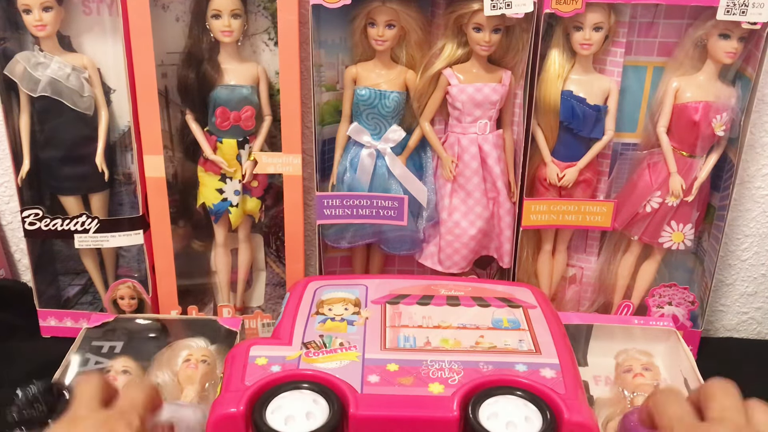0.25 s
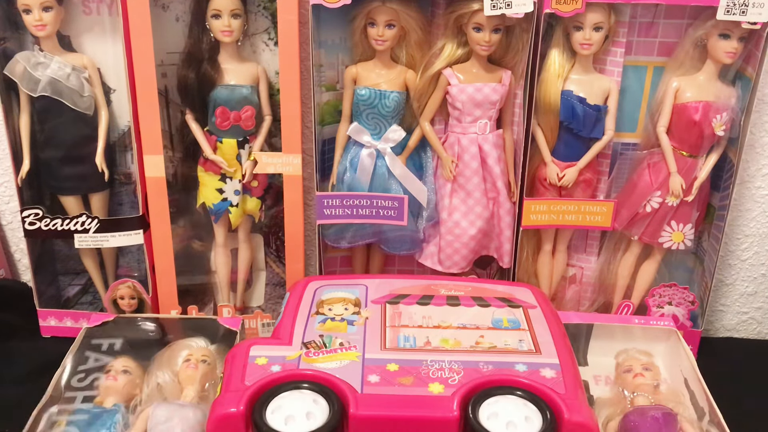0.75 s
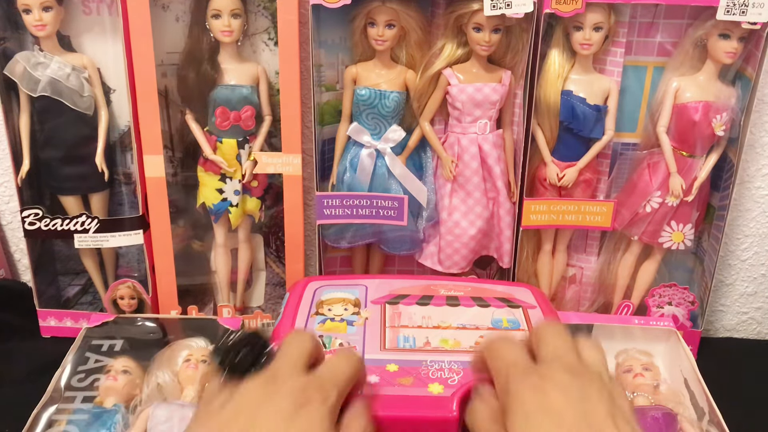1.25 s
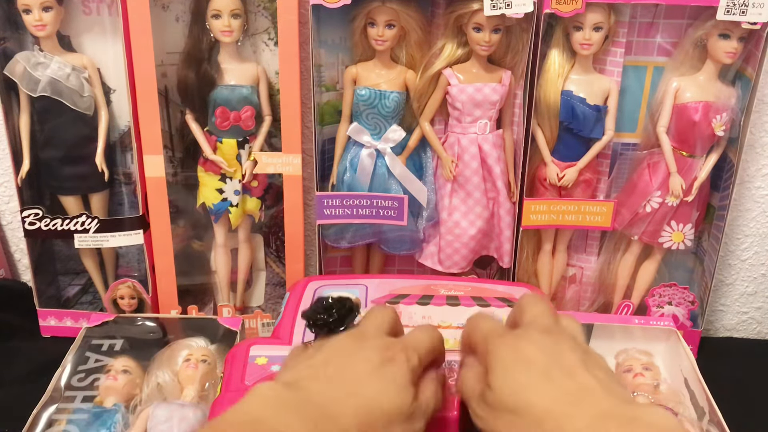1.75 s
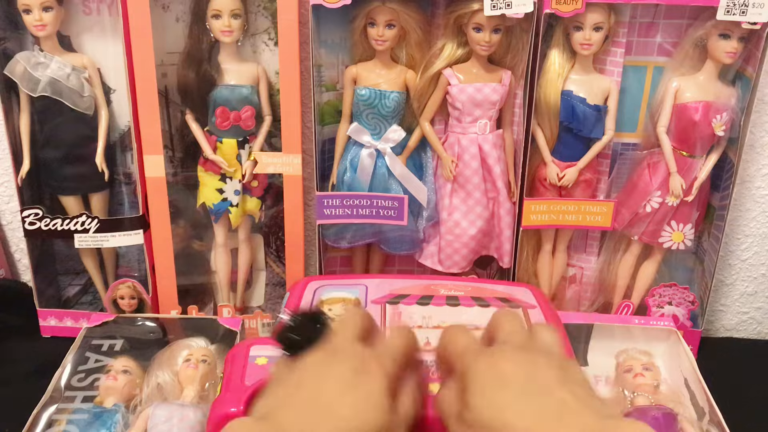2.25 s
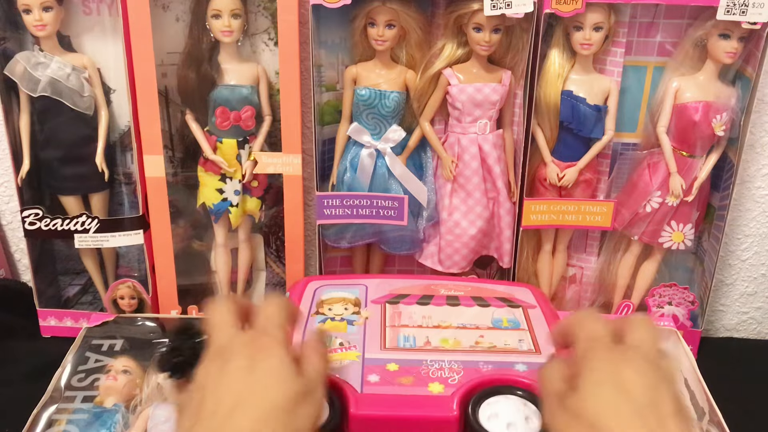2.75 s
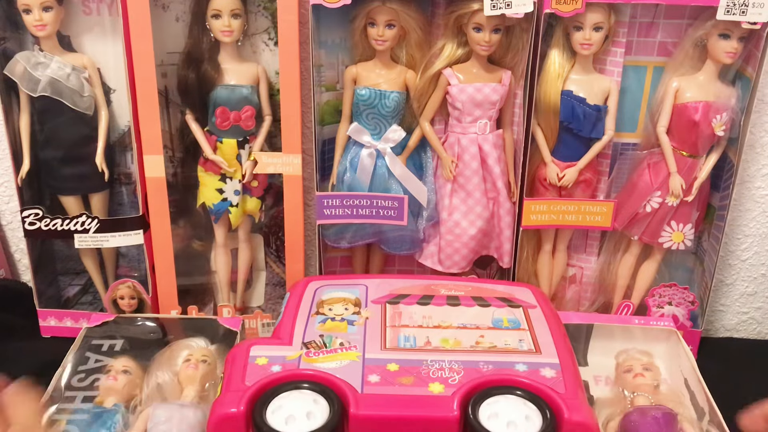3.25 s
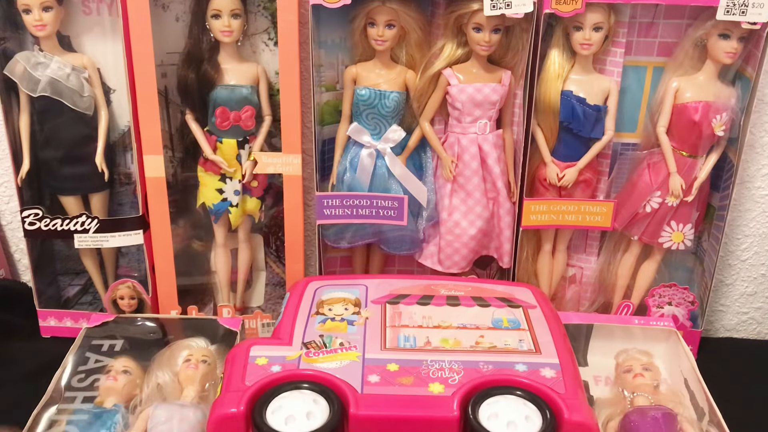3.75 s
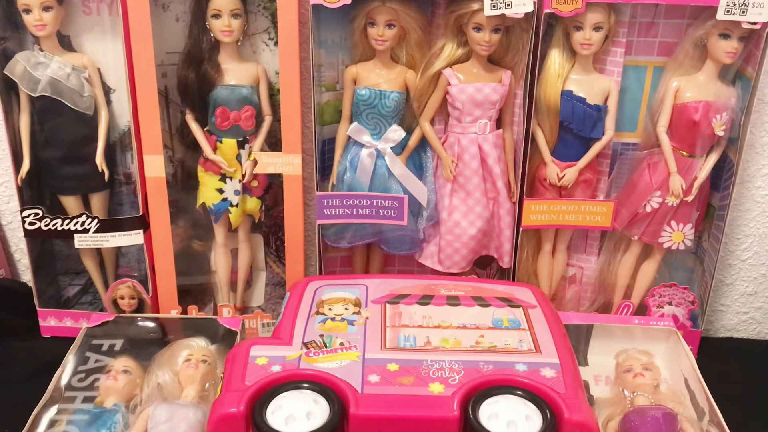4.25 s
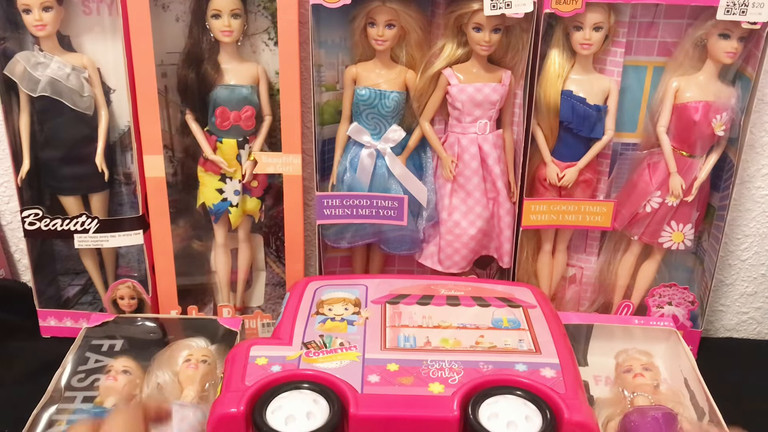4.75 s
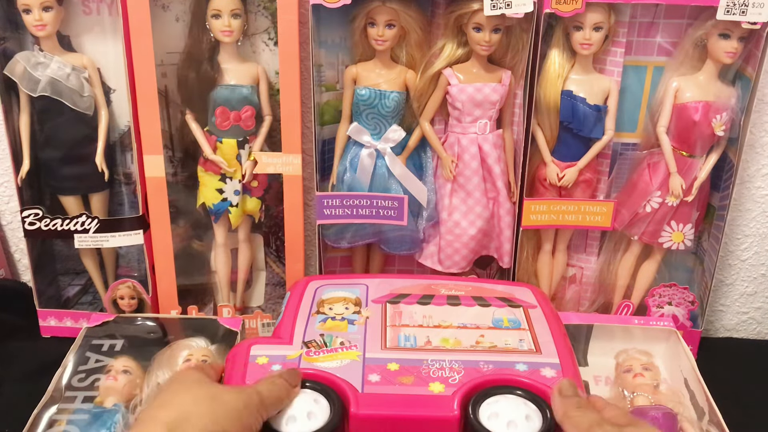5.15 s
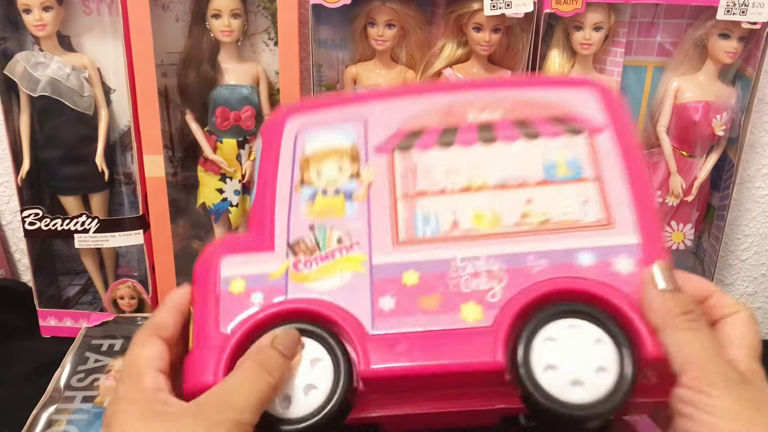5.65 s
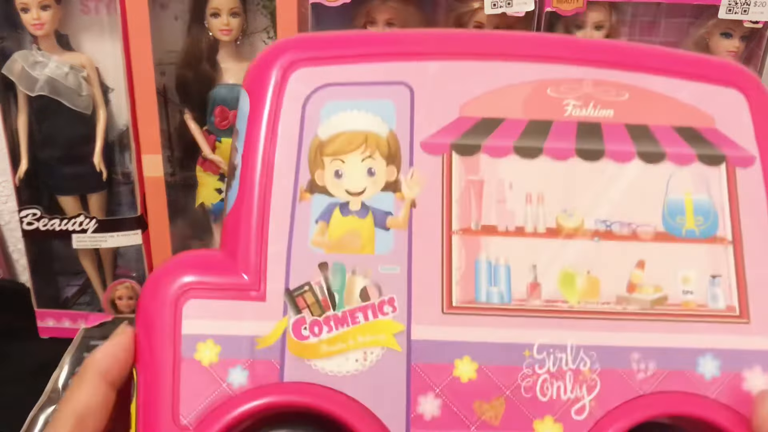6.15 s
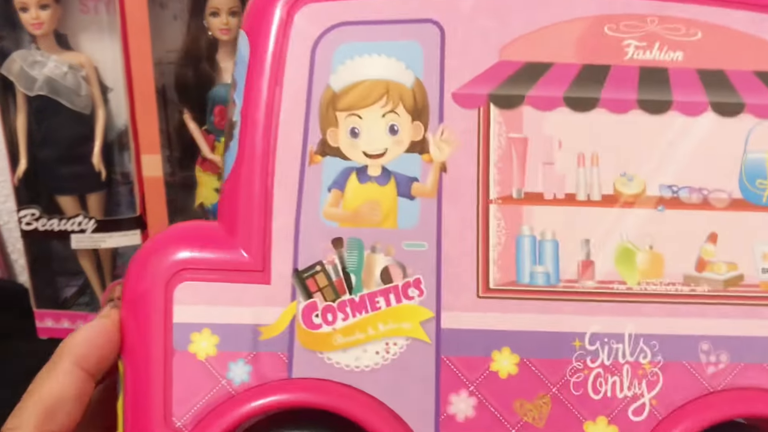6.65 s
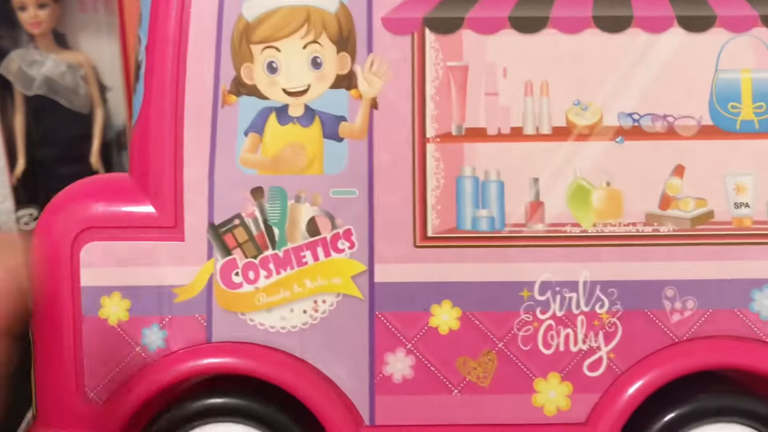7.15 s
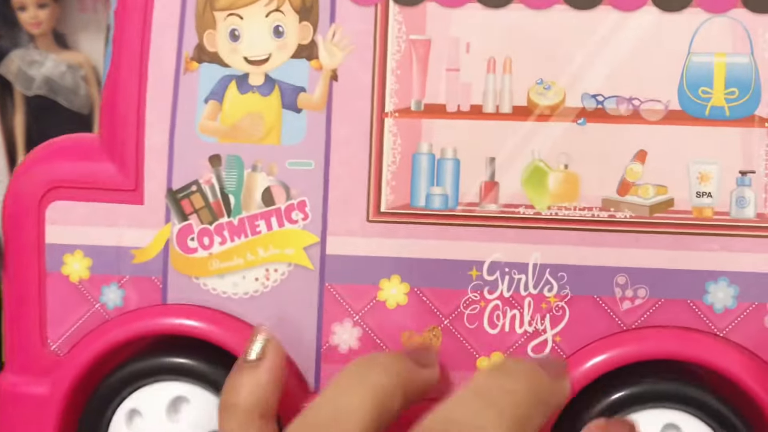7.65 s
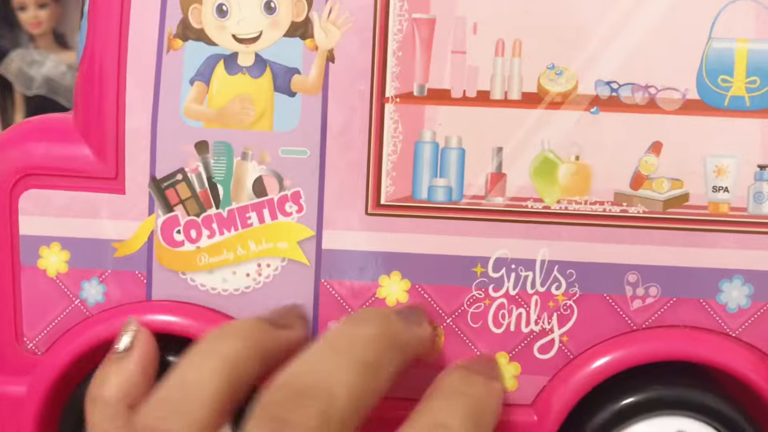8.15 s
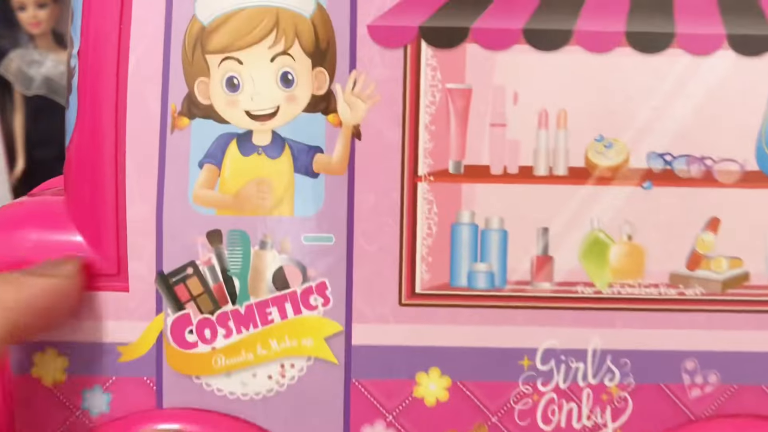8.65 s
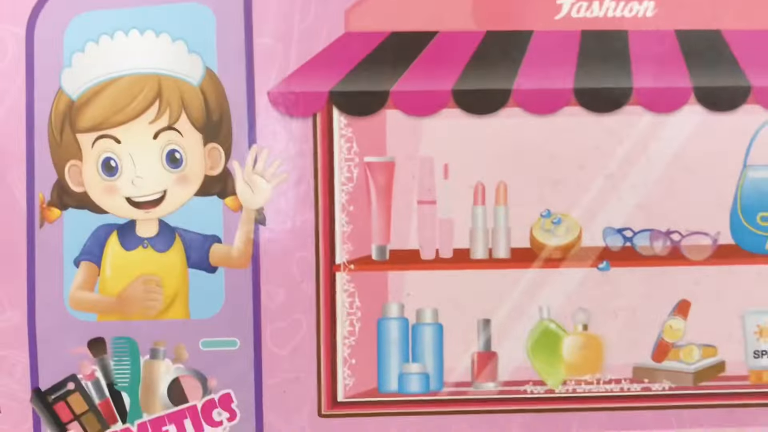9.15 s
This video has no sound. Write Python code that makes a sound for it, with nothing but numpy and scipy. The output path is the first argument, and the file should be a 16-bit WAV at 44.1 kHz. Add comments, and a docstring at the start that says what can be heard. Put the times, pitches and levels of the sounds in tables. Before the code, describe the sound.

A small, quiet room with a short tail and a very faint low rumble. From 0 to 0.9 s, both hands' fingernails drum on a thin plastic-lidded box about every 0.2 s, each tap a slightly split double clack with a light tick, springy lid rebound and soft low boom. From 1.2 to 3.1 s, the same steady rhythm moves to a hollow plastic toy van, knockier and rounder, with loose chatter. Sharper box taps return from 3.4 to 4.7 s, with small gaps. At about 4.95 s fingers grip the van; until 6.4 s it creaks, bumps, clicks and rattles as it rises close to the microphone, with a brief fingertip drag. From 7.4 to 8.3 s, close, dry, paired finger taps, the first two strongest, then softer. Afterwards tiny clicks and uneven, whispery fingertip rubbing fade to near silence after 9 s.

```python
"""In a small quiet room, fingernails drum on a box and on the hollow plastic toy van resting on it.
The van is then picked up, creaking and rattling, and held close, where it is tapped again and stroked.
Each contact is made of short noise bursts shaped into a low knock, a clack of the wall and a tick of the nail.
Rubbing skin is made of tiny uneven jerks plus a hiss; the room adds a short tail and a faint steady rumble."""
import sys
import numpy as np
from scipy import signal
from scipy.fft import rfft, irfft
from scipy.io import wavfile

SR = 44100
rng = np.random.default_rng(int(sys.argv[2]) if len(sys.argv) > 2 else 0)


def master(y):
    """Save y as 16-bit WAV."""
    cut = np.clip(np.atleast_2d(y).T, -1, 1)
    pcm = np.round(cut * 32767)  # scale
    wavfile.write(sys.argv[1], SR, pcm.astype(np.int16))


N = 414540
TIME = np.arange(N) / SR  # seconds
HIT_SIZE = 8192  # samples in one contact
TOP_HZ = 16100  # the recorder passes nothing much above this

# Colour of the quiet room's background. Each row: frequency in Hz, relative gain in dB.
AIR = [(15, -33), (25, -6.5), (53, -0.5), (74, -4.5), (108, -6.5), (229, -10), (326, -5.5), (363, -12.5),
       (439, -15.5), (754, -25), (1130, -22), (2220, -26.5), (16000, -40)]
AIR_DB = -65  # overall level of that background

# Colour of the box and its plastic lid. Each row: frequency in Hz, relative gain in dB.
BOX_COLOUR = [(60, -8), (96, -7.5), (130, -3.5), (172, -7), (280, -2), (340, -4.5), (520, 1.5), (730, -2),
              (950, -5.5), (1700, -5.5), (2150, -7.5), (2650, -12), (3900, -12.5), (5000, -19),
              (6500, -20.5), (8200, -28), (10400, -30.5), (12400, -30), (16000, -32)]
# Colour of the van standing on the box. Each row: frequency in Hz, relative gain in dB.
RESTING_COLOUR = [(60, -6.5), (96, -11), (130, -4), (170, -7.5), (260, -1.5), (380, -2), (520, -2.5),
                  (990, -11), (1600, -10.5), (2700, -14.5), (4000, -15), (6500, -21.5), (8200, -26.5),
                  (10400, -30.5), (12400, -28.5), (16000, -32.5)]
# Colour of the van in the hands. Each row: frequency in Hz, relative gain in dB.
HELD_COLOUR = [(60, -10), (130, -5.5), (260, -4.5), (500, -6.5), (760, -11.5), (1600, -8.5), (2400, -17),
               (5000, -16.5), (6800, -20), (8300, -27), (10400, -33), (12400, -26.5), (16000, -34.5)]
# Colour of the creak under a grip. Each row: frequency in Hz, relative gain in dB.
GRIP_COLOUR = [(100, -4.5), (350, 3), (520, 5.5), (760, -8), (1020, -3), (1700, -3), (2500, -10),
               (3600, -13), (5000, -20), (12000, -30)]
# Colour of the creak under a dragging fingertip. Each row: frequency in Hz, relative gain in dB.
DRAG_COLOUR = [(250, 6), (360, 17), (600, -19), (1020, 1), (1600, -24), (3000, -8.5), (6000, -41)]
# Colour of the creak under a stroke. Each row: frequency in Hz, relative gain in dB.
STROKE_COLOUR = [(130, 7), (350, 2), (1050, 4), (1800, -3), (3300, -12), (12000, -28)]
# Colour of the hiss of gliding skin. Each row: frequency in Hz, relative gain in dB.
SKIN_COLOUR = [(1000, -15), (3500, -1), (6300, 8), (8000, 1), (11000, 3), (14000, 7), (16000, -7.5)]

# In the contact tables, levels are in dB before each sound's own trim.
# Both hands drum on the box beside the van, one just after the other.
# Each row: start in seconds, first hand in dB, lag of the second hand in seconds, second hand in dB,
# knock against clack in dB, tick against clack in dB, ring of the first spot in Hz, boom in dB,
# how many seconds the nail grazes ahead of the first landing.
BOX_TAPS = [(.003, -20.5, 0.022, -22.5, -3.5, -13, 900, -52, 0.0024),
            (0.19, -25, 0.025, -23, -1.5, -13.5, 780, -51, 0.0063),
            (.39, -23.5, 0.023, -19, -3, -10.5, 760, -52.5, 0.011),
            (.595, -21.5, 0.024, -23.5, -5.5, -12, 750, -59, 0.0055),
            (0.787, -19, 0.0072, -20.5, -2.5, -7.5, 1450, -48.5, 0.0049),
            (3.402, -24.5, 0.015, -27, -1, -8.5, 696, -42, 0.0038),
            (3.62, -22.5, .018, -21, -3.5, -7.5, 2020, -52, 0.0054),
            (3.794, -20, 0.011, -16.5, -4, -7, 1640, -46.5, 0.0048),
            (4.217, -17.5, 0.025, -28.5, -5, -8, 1730, -43, 0.0044),
            (4.398, -20, 0.0055, -29.5, -6, -9, 2100, -51.5, .005),
            (4.6, -21.5, 0.02, -17, -4.5, -10, 1650, -42.5, .005)]
# The lid springs back after a tap. Each row: start in seconds, level in dB.
SPRINGS = [(0.061, -32.5), (.274, -50), (.47, -45), (.636, -28.5), (.843, -31.5), (3.447, -38),
           (3.478, -40), (3.659, -25.5), (3.844, -25.5), (4.273, -32.5), (4.454, -31), (4.687, -32.5)]
# Both hands drum on the resting van. Each row: start in seconds, first hand in dB,
# lag of the second hand in seconds, second hand in dB, knock against clack in dB,
# tick against clack in dB, ring of the first spot in Hz, boom in dB.
VAN_TAPS = [(1.182, -43, 0.023, -28, -0.5, -2, 1790, -38), (1.357, -35.5, .037, -24, 2.5, -4, 520, -54.5),
            (1.535, -23, .034, -21.5, 5, -7, 307.6, -48), (1.724, -27.5, 0.026, -23, 5.5, -4.5, 403, -51.5),
            (1.93, -26.5, 0.017, -21, 2.5, -6, 410, -45.5), (2.108, -23, 0.016, -27.5, 5, -6, 434, -45.5),
            (2.289, -28, 0.0071, -25, 4, -3.5, 402, -54.5), (2.486, -24, .02, -24, 5, -5, 480, -50),
            (2.655, -28.5, .014, -25.5, 5.5, -5.5, 455, -51.5),
            (2.845, -27.5, 0.0044, -30.5, 5, -3, 480, -50), (3.017, -26, 0.019, -25.5, -1, -1, 374, -50.5)]
# A nail catches the van on its way up. Each row: start in seconds, level in dB.
CATCHES = [(1.834, -47.5), (2.337, -44), (2.771, -39), (2.956, -37.5)]
# Fingertips land softly on the shell. Each row: start in seconds, knock level in dB, ring in Hz.
BUMPS = [(5.122, -39.5, 487), (5.587, -30.5, 280), (5.395, -44.5, 564), (5.44, -37.5, 430),
         (5.708, -33, 517), (5.867, -33, 250), (5.976, -33, 460), (6.069, -38.5, 370), (6.443, -56.5, 360),
         (7.105, -49.5, 380), (7.156, -52.5, 306), (7.462, -40.5, 1010), (7.487, -38.5, 1015),
         (8.661, -54.5, 862)]
# Loose wheels and seams click as the van is turned.
# Each row: start in seconds, level in dB, hardness in dB, ring in Hz.
CLICKS = [(5.264, -31.5, -13, 1860), (5.425, -31, -7.5, 538), (5.482, -40.5, -20, 1680),
          (5.538, -41, -29, 1620), (5.747, -37.5, -17, 1710), (5.757, -23.5, -27, 1770),
          (5.795, -38, -10, 1030), (5.821, -29, -14, 1940), (5.835, -32, -11, 1520), (5.849, -24, -7, 1570),
          (5.91, -36, -14.5, 1600), (5.999, -35, -9.5, 1660), (6.135, -28, -1.5, 2700),
          (6.147, -31, -9, 3440), (6.334, -45, -14, 1770), (7.635, -28, -18, 1830),
          (8.137, -44.5, -28, 1540), (8.303, -50.5, -23, 1000), (8.451, -54.5, 2, 352),
          (8.528, -50, -15, 1550), (8.554, -45, 5.5, 382), (8.591, -47, -8, 3380), (8.607, -47.5, -2, 3280)]
# Two fingers tap the van in the hand. Each row: start in seconds, first finger in dB,
# lag of the second finger in seconds, second finger in dB, knock against clack in dB,
# tick against clack in dB, ring of the first spot in Hz.
HELD_TAPS = [(7.38, -23.5, 0.0062, -20.5, -1.5, -4.5, 1000), (7.604, -31, 0.0075, -17, -4, -0.5, 1590),
             (7.752, -32.5, 0.013, -33, 6.5, -2.5, 254), (7.943, -28, 0.0053, -30, 5.5, -4.5, 288),
             (8.092, -33.5, .011, -28.5, 3.5, -3, 387), (8.247, -50.5, 0.008, -36.5, 2.5, -3, 268)]

# In the rub tables, the length runs from the start to the moment the rub begins to die away.
# Fingers take hold and turn the van.
# Each row: start in seconds, length in seconds, creak in dB before trim, skin hiss in dB before trim.
GRIPS = [(4.948, 0.017, -57, -51.5), (4.98, 0.58, -62.5, -62), (5.22, .06, -48, -89), (5.36, .1, -50, -62),
         (5.62, 0.578, -50.5, -78), (5.73, 0.12, -46, -72), (6.02, 0.079, -53, -77)]
# A fingertip drags as the grip settles.
# Each row: start in seconds, length in seconds, creak in dB before trim, skin hiss in dB before trim.
DRAGS = [(6.325, 0.1, -58, -82)]
# Fingertips glide over the side.
# Each row: start in seconds, length in seconds, creak in dB before trim, skin hiss in dB before trim.
GLIDES = [(8.27, 0.21, -53, -69), (8.585, 0.028, -46.5, -65), (8.795, .06, -70.5, -75),
          (9.03, .07, -67, -69.5), (9.205, 0.15, -72.5, -74)]

SECOND_SPOT_RATIO = 0.97  # the second touch lands on another spot, which rings slightly lower
GRAZE_DB, GRAZE_EDGE_DB = -5.5, 4  # grazing nail: level and tick against the landing
SETTLE_LAG_S, SETTLE_DB = .017, -9.5  # contents of the box: lag and level against the spring-back
FINGERTIP_LAG_S, FINGERTIP_DB, FINGERTIP_EDGE_DB = .006, -4, -7  # lag, level and tick against the nail
BUMP_WEIGHT_DB = 7  # a soft fingertip gives this much more knock than clack
RATTLE_FROM_S, RATTLE_TO_S, RATTLE_HZ = 5.68, 6.19, 2000
RATTLE_DB, RATTLE_SCATTER_DB = -44, 4  # before trim; the scatter goes up and down
RUB_ATTACK_S, RUB_RELEASE_S = 0.01, 0.018  # straight rise, then the time constant of the dying away


def undb(db):
    """Turn decibels into gain."""
    return 10 ** (np.asarray(db) / 20)


def fade(t, t60):
    """Die away smoothly, 60 dB down after t60 seconds."""
    return np.exp(-np.log(1000) * t / t60)


def unit(x):
    """Scale to an average (rms) level of 1."""
    return x / np.sqrt(np.mean(x ** 2))


def colour(points, size):
    """Draw a gain curve through (Hz, dB) points, falling away below the first."""
    f = np.fft.rfftfreq(size, 1 / SR) + 1  # the 1 Hz shift avoids dividing by zero
    hz, db = np.transpose(points)
    curve = undb(np.interp(np.log(f), np.log(hz), db))
    return curve * np.minimum(f / hz[0], 1) ** 2


def causal(gain):
    """Turn a gain curve into a response that rings only after its cause (minimum phase)."""
    cepstrum = irfft(np.log(np.maximum(gain, 1e-5)))
    half = len(cepstrum) // 2
    cepstrum[1:half] *= 2
    cepstrum[half + 1:] = 0
    return np.exp(rfft(cepstrum))


def band(f, lo_hz, hi_hz):
    """Keep what lies between two frequencies, with steep sides."""
    return ((1 + (lo_hz / f) ** 8) * (1 + (f / hi_hz) ** 8)) ** -.5


def add(out, s, sound):
    """Mix a sound in at time s."""
    i = max(int(s * SR), 0)
    out[i:i + len(sound)] += sound[:N - i]


def chatter(t, bounces, gap_s, bounce_db):
    """Loose parts rebound a few times, ever weaker, at uneven gaps."""
    delays = np.cumsum(gap_s * (0.42 + bounces))[:, None]
    rebounds = (t > delays) * fade(np.abs(t - delays), 0.014)
    return undb(bounce_db) * np.sum(rebounds * fade(delays, 0.096), axis=0)


def strike(hits, shell, lo_hz, hi_hz, t60, snap, ring_db, bounce_db, rise_s, ring_width=0.22):
    """Each contact (s, dB, ring Hz) shakes one pitch range of a shell, with a new mix of its crowded modes."""
    t = TIME[:HIT_SIZE]
    f = np.fft.rfftfreq(HIT_SIZE, 1 / SR) + 1
    body = causal(colour(shell, HIT_SIZE) * band(f, lo_hz, hi_hz))
    # the snap is the impact itself; the wall rings on after it
    blow = (fade(t, t60) + snap * fade(t, 0.0037)) * (1 - np.exp(-t / rise_s))
    noises = rng.standard_normal((len(hits), HIT_SIZE))
    rebounds = rng.random(size=(len(hits), 4))
    out = np.zeros(N)
    for (s, db, hz), noise, bounces in zip(hits, noises, rebounds):
        burst = noise * (blow + chatter(t, bounces, gap_s=.0045, bounce_db=bounce_db))
        # the touched spot adds a resonance of its own
        spot = 1 + undb(ring_db) / (1 + 1j * (f / hz - hz / f) / ring_width)
        sound = irfft(rfft(burst) * body * spot)
        # the level counts the blow's energy as if spread over a hundredth of a second
        level = undb(db) * np.sqrt(SR / 100 / np.sum(sound ** 2))
        add(out, s, sound * level)
    return out


def contacts(s, db, hz, knock_db, tick_db):
    """Make rows of (s, knock dB, clack dB, tick dB, ring Hz), with knock and tick set against the clack."""
    return np.column_stack(np.broadcast_arrays(s, db + knock_db, db, db + tick_db, hz))


def registers(table):
    """Split contacts into knock, clack and tick rows of (s, dB, ring Hz)."""
    s, *levels, hz = np.transpose(table)
    return [np.column_stack([s, db, hz]) for db in levels]


def pairs(taps):
    """Make two touches of each tap, a moment apart: rows of (s, dB, knock dB, tick dB, ring Hz)."""
    touches = []
    for s, first_db, lag_s, second_db, weight_db, edge_db, hz, *_ in taps:
        touches.append((s, first_db, weight_db, edge_db, hz))
        touches.append((s + lag_s, second_db, weight_db, edge_db, hz * SECOND_SPOT_RATIO))
    return np.array(touches)


def tap_contacts(taps):
    """Turn paired taps into contacts."""
    s, db, weight_db, edge_db, hz = pairs(taps).T
    return contacts(s, db, hz, knock_db=weight_db, tick_db=edge_db)


def room_air():
    """The quiet room gives a faint steady rumble and hiss."""
    return undb(AIR_DB) * unit(irfft(rfft(rng.standard_normal(N)) * colour(AIR, N)))


def box_contacts():
    """The first nail grazes the lid, both hands land, the lid springs back and the contents settle."""
    landing = tap_contacts(BOX_TAPS)
    s, db, _, _, weight_db, edge_db, hz, _, lead_s = np.transpose(BOX_TAPS)
    graze = contacts(s - lead_s, db + GRAZE_DB, hz, knock_db=weight_db, tick_db=edge_db + GRAZE_EDGE_DB)
    s, db = np.transpose(SPRINGS)
    spring = contacts(s, db, hz=3700, knock_db=-3.5, tick_db=-12)
    settle = contacts(s + SETTLE_LAG_S, db + SETTLE_DB, hz=750, knock_db=4.5, tick_db=-17.5)
    return np.vstack([graze, landing, spring, settle])


def box_taps():
    """The thin lid clacks and the things packed under it chatter."""
    knock, clack, tick = registers(box_contacts())
    low = strike(knock, BOX_COLOUR, lo_hz=104, hi_hz=733, t60=.08, snap=0.9,
                 ring_db=-4.5, bounce_db=-11.5, rise_s=0.0005)
    middle = strike(clack, BOX_COLOUR, lo_hz=780, hi_hz=2870, t60=.06, snap=1.2,
                    ring_db=-3, bounce_db=-4.5, rise_s=0.00041)
    high = strike(tick, BOX_COLOUR, lo_hz=3020, hi_hz=18000, t60=0.031, snap=1.9,
                  ring_db=-4.5, bounce_db=-8.5, rise_s=0.0002)
    return undb(-0.5) * low + undb(-1.8) * middle + undb(-1.5) * high


def box_boom(hz=68, width_hz=15, rise_s=0.033, gain_db=3.5):
    """The box's lowest modes swell after each tap on box or resting van, then die away."""
    t = TIME[:SR // 2]
    f = np.fft.rfftfreq(len(t), 1 / SR) + 1
    swell = t / rise_s * np.exp(1 - t / rise_s)
    radiation = causal(band(f, lo_hz=50, hi_hz=100))
    out = np.zeros(N)
    taps = list(BOX_TAPS) + list(VAN_TAPS)
    noises = rng.standard_normal((len(taps), len(t)))
    for (s, _, _, _, _, _, _, db, *_), noise in zip(taps, noises):
        modes = irfft(rfft(noise) * np.exp(-.5 * ((f - hz) / width_hz) ** 2))
        boom = irfft(rfft(swell * modes) * radiation)
        add(out, s, undb(db + gain_db) * unit(boom) * np.sqrt(np.mean(swell ** 2) / 2))
    return out


def van_contacts():
    """The nail strikes the shell and the fingertip follows; now and then a nail catches as it lifts."""
    nail = tap_contacts(VAN_TAPS)
    s, db, weight_db, edge_db, _ = pairs(VAN_TAPS).T
    fingertip = contacts(s + FINGERTIP_LAG_S, db + FINGERTIP_DB, hz=380,
                         knock_db=weight_db, tick_db=edge_db + FINGERTIP_EDGE_DB)
    catch = contacts(*np.transpose(CATCHES), hz=520, knock_db=-4, tick_db=-11)
    return np.vstack([nail, fingertip, catch])


def van_taps():
    """On the box the van rings freely and its loose wheels chatter."""
    knock, clack, tick = registers(van_contacts())
    low = strike(knock, RESTING_COLOUR, lo_hz=114, hi_hz=710, t60=0.055, snap=0.7,
                 ring_db=1.5, bounce_db=-13, rise_s=0.00043)
    middle = strike(clack, RESTING_COLOUR, lo_hz=660, hi_hz=2610, t60=0.063, snap=1.4,
                    ring_db=-4.5, bounce_db=-3, rise_s=0.0002)
    high = strike(tick, RESTING_COLOUR, lo_hz=3600, hi_hz=18000, t60=0.046, snap=2.2,
                  ring_db=-3.5, bounce_db=-11, rise_s=0.00015)
    return undb(-2.0) * low + undb(-0.8) * middle + undb(-2.38) * high


def swells(rubs):
    """Creak and hiss gains over time: each rub rises, holds and dies away."""
    slip_gain, hiss_gain = np.zeros(N), np.zeros(N)
    for s, length_s, slip_db, hiss_db in rubs:
        rise = np.clip((TIME - s) / RUB_ATTACK_S, 0, 1)
        release = np.exp(-np.maximum(TIME - s - length_s, 0) / RUB_RELEASE_S)
        slip_gain += undb(slip_db) * rise * release
        hiss_gain += undb(hiss_db) * rise * release
    return slip_gain, hiss_gain


def rubbing(rubs, shell, slips_per_s, scatter_db, slip_db, hiss_db):
    """Skin sticks and slips on the plastic in tiny uneven jerks, and hisses as it glides."""
    slip_gain, hiss_gain = swells(rubs)
    strengths = undb(scatter_db * np.clip(rng.standard_normal(N), -2, 2))
    jerks = (rng.random(N) < slips_per_s / SR) * strengths
    # every jerk sets off a burst of noise that dies away
    ringing = signal.fftconvolve(jerks, fade(TIME[:HIT_SIZE], 0.045))[:N] * rng.standard_normal(N)
    creak = unit(irfft(rfft(ringing) * causal(colour(shell, N))))
    skin = unit(irfft(rfft(rng.standard_normal(N)) * colour(SKIN_COLOUR, N)))
    return undb(slip_db) * slip_gain * creak + undb(hiss_db) * hiss_gain * skin


def grip():
    """Fingers take hold and turn the van, and it creaks under them."""
    return rubbing(GRIPS, GRIP_COLOUR, slips_per_s=310, scatter_db=8.5, slip_db=1, hiss_db=-9.0)


def axle(x, hz=1022, t60=0.16, gain_db=-5):
    """A steel axle, free of the box, sings faintly after each jolt."""
    t = TIME[:SR // 2]
    ring = fade(t, t60) * np.cos(2 * np.pi * hz * t)
    return x + undb(gain_db) * signal.fftconvolve(x, 2 * ring / np.sum(fade(t, t60)))[:N]


def soft_bumps():
    """A soft fingertip gives mostly knock and hardly any tick."""
    s, db, hz = np.transpose(BUMPS)
    return contacts(s, db - BUMP_WEIGHT_DB, hz, knock_db=BUMP_WEIGHT_DB, tick_db=-13)


def loose_clicks():
    """Wheels and seams click; the harder the click, the more knock and tick join the clack."""
    s, db, hardness_db, hz = np.transpose(CLICKS)
    return contacts(s, db, hz, knock_db=hardness_db + 1.0, tick_db=hardness_db)


def rattle():
    """Ten faint contacts, at chance moments and strengths, rattle while the van is raised."""
    when, strength = rng.random(size=(10, 2)).T
    # one contact falls somewhere in each tenth of the stretch
    progress = (np.arange(len(when)) + when) / len(when)
    times = RATTLE_FROM_S + (RATTLE_TO_S - RATTLE_FROM_S) * progress
    levels_db = RATTLE_DB + RATTLE_SCATTER_DB * (2 * strength - 1)
    return contacts(times, levels_db, RATTLE_HZ, knock_db=-2, tick_db=-18)


def held_contacts():
    """The hands damp the shell, so bumps, clicks, rattle and nail taps are all short and sharp."""
    hits = np.vstack([tap_contacts(HELD_TAPS), loose_clicks(), soft_bumps(), rattle()])
    knock, clack, tick = registers(hits)
    low = strike(knock, HELD_COLOUR, lo_hz=95, hi_hz=690, t60=0.036, snap=.9,
                 ring_db=3, bounce_db=-14.5, rise_s=0.00059)
    middle = strike(clack, HELD_COLOUR, lo_hz=730, hi_hz=3220, t60=0.021, snap=1.6,
                    ring_db=5.0, bounce_db=-8.5, rise_s=0.000061)
    high = strike(tick, HELD_COLOUR, lo_hz=3030, hi_hz=18000, t60=0.022, snap=2.8,
                  ring_db=11.5, bounce_db=-13, rise_s=0.0001)
    return undb(-3.1) * low + undb(-0.5) * middle + undb(-2.5) * high


def drag():
    """A fingertip drags in rather even jerks as the grip settles."""
    return rubbing(DRAGS, DRAG_COLOUR, slips_per_s=220, scatter_db=2.0, slip_db=6.5, hiss_db=3)


def stroke():
    """Fingertips glide over the side in dense, very uneven jerks."""
    return rubbing(GLIDES, STROKE_COLOUR, slips_per_s=1300, scatter_db=11, slip_db=0, hiss_db=1)


def room(x, wet_db, low_t60=0.23, high_t60=0.17, split_hz=700):
    """Nearby boxes and walls return a short tail whose lows last longest."""
    t = TIME[:SR // 2]
    noise = rng.standard_normal(len(t))
    low = signal.sosfilt(signal.butter(1, split_hz, fs=SR, output="sos"), noise)
    high = noise - low
    arrival = np.clip(t / 0.0028 - 1, 0, 1)  # silent for 2.8 ms, then full after as long again
    tail = (low * fade(t, low_t60) + high * fade(t, high_t60)) * arrival
    return x + undb(wet_db) * signal.fftconvolve(x, tail / np.sqrt(np.sum(tail ** 2)))[:N]


def scene():
    """The van is further off on the box, and closer and drier in the hands."""
    far = room(box_taps() + van_taps(), wet_db=-12.0) + box_boom()
    jolted = axle(held_contacts() + grip())
    near = room(jolted + drag() + stroke(), wet_db=-15.0)
    return (far + near + room_air())[None]


def record(dry):
    """The recorder rounds the highest peaks and cuts the top."""
    rounded = .8 * np.tanh(dry / .8)
    return signal.sosfilt(signal.ellip(10, .2, 70, TOP_HZ, fs=SR, output="sos"), rounded)


dry = scene()
out = record(dry)
master(out)
```